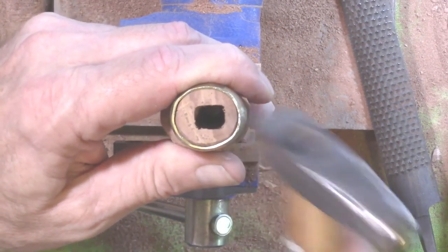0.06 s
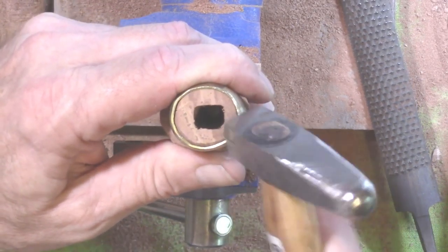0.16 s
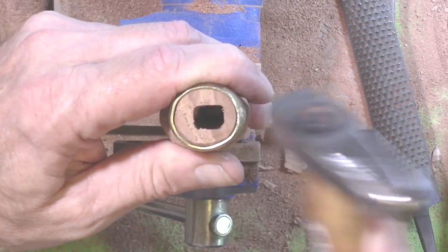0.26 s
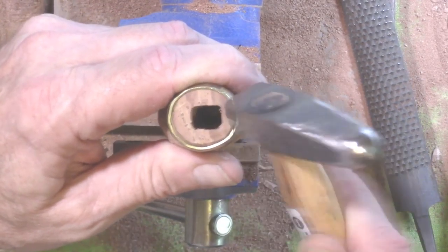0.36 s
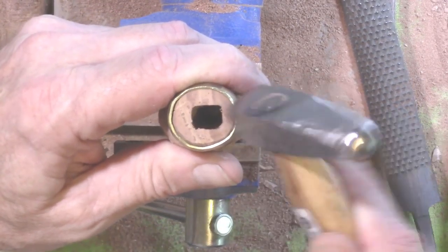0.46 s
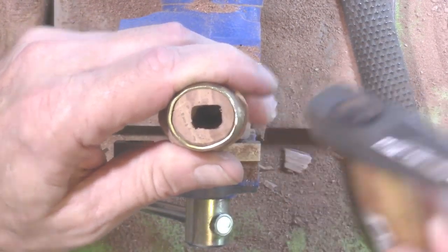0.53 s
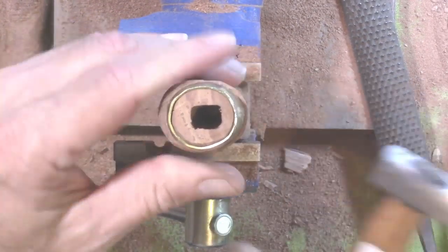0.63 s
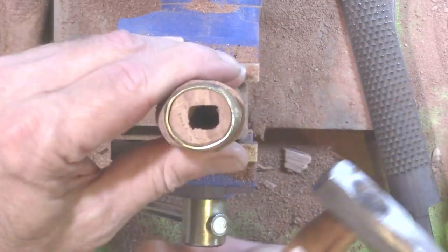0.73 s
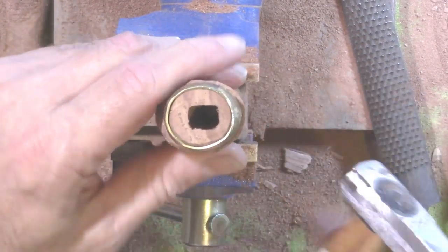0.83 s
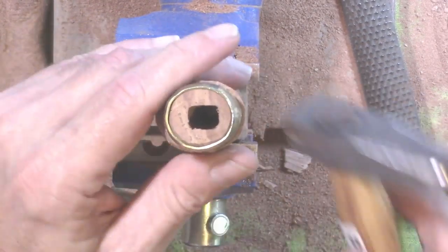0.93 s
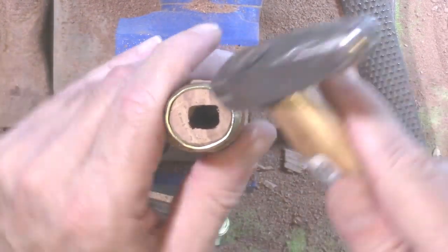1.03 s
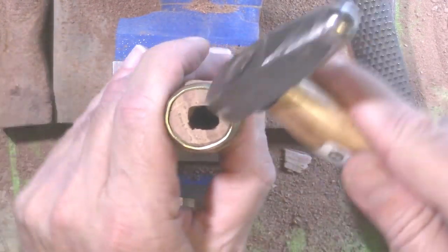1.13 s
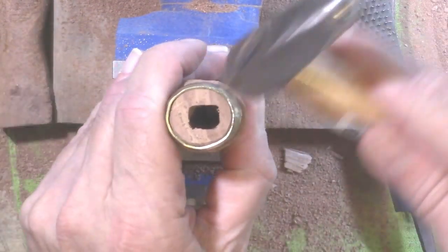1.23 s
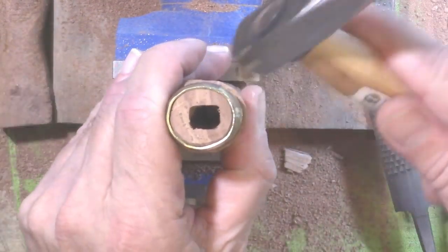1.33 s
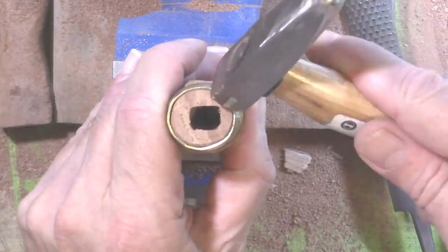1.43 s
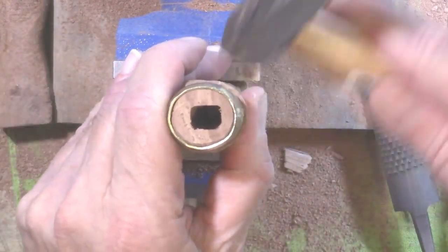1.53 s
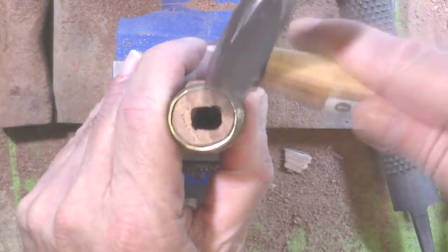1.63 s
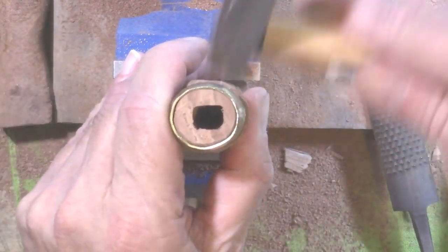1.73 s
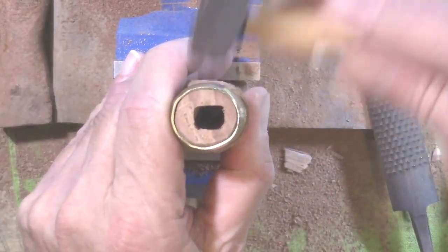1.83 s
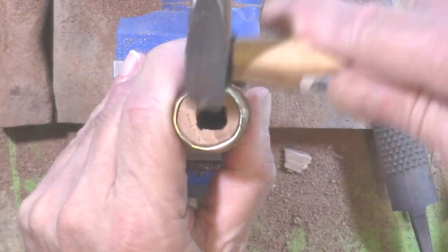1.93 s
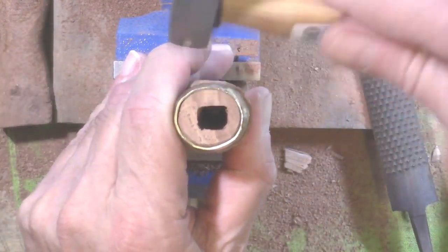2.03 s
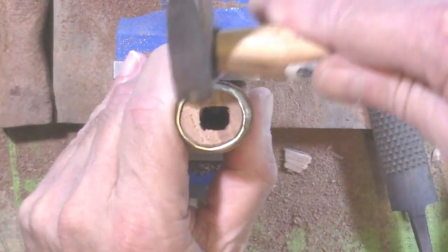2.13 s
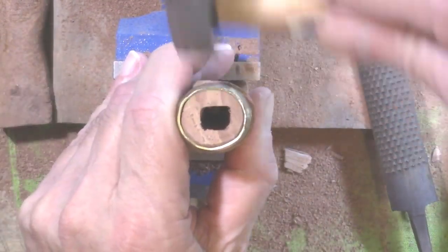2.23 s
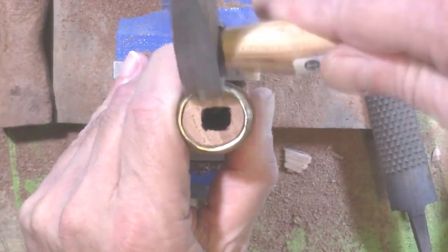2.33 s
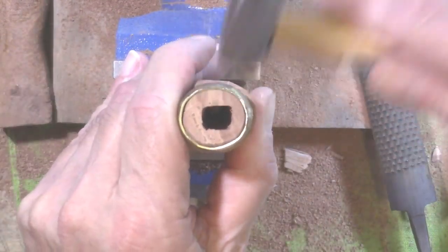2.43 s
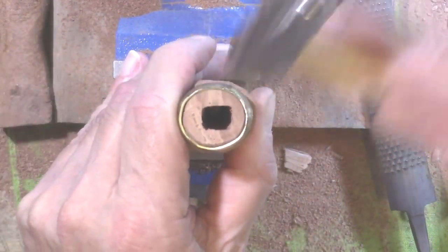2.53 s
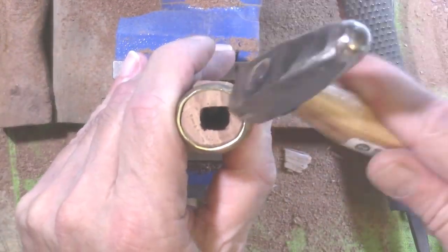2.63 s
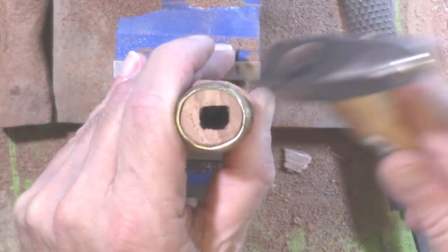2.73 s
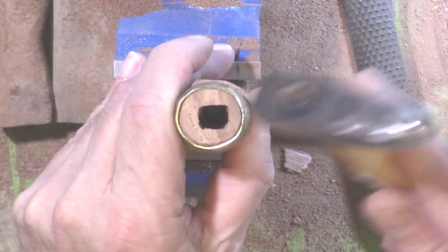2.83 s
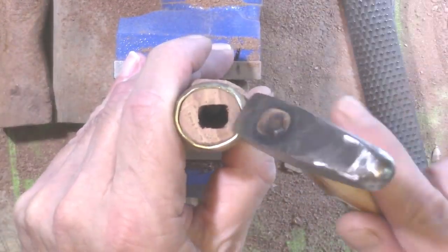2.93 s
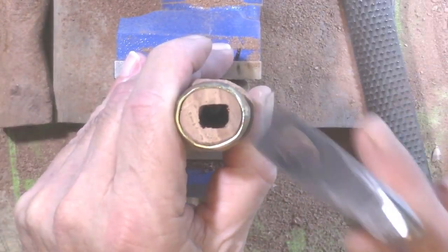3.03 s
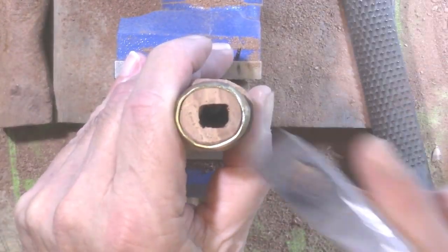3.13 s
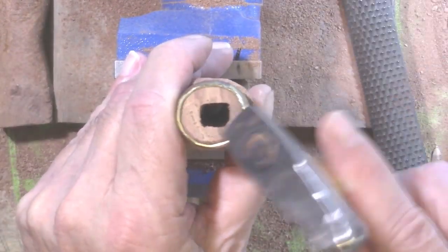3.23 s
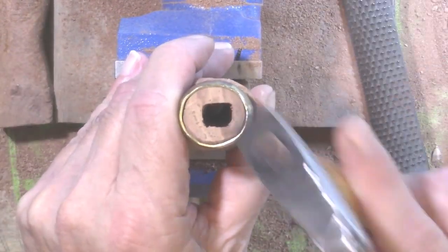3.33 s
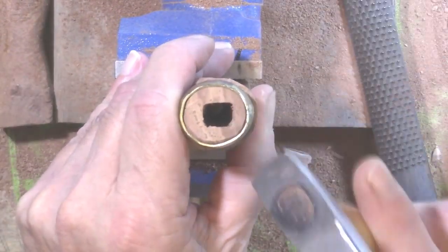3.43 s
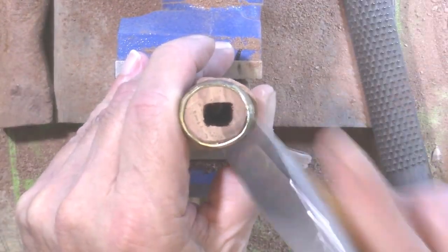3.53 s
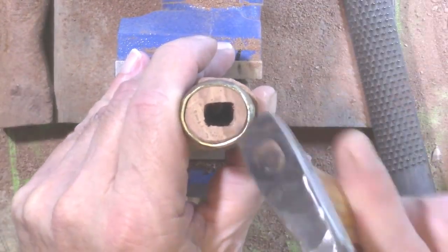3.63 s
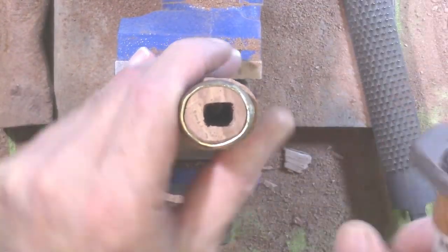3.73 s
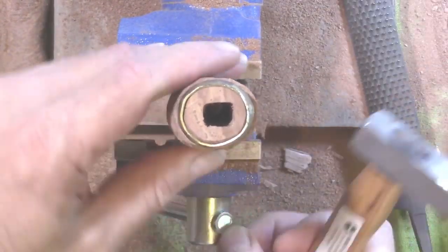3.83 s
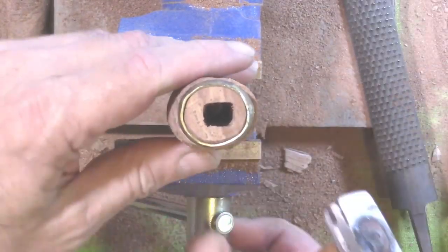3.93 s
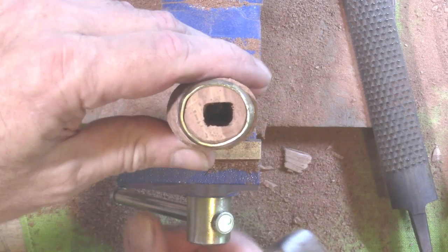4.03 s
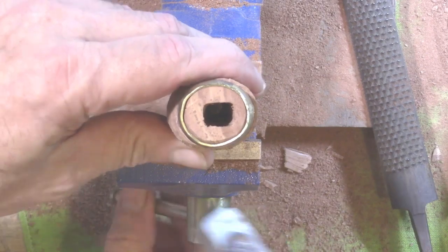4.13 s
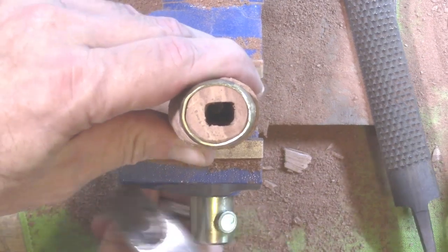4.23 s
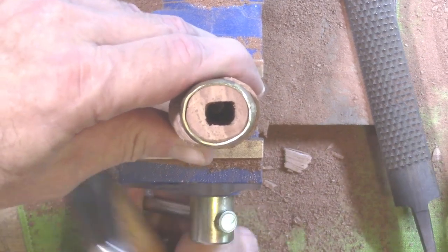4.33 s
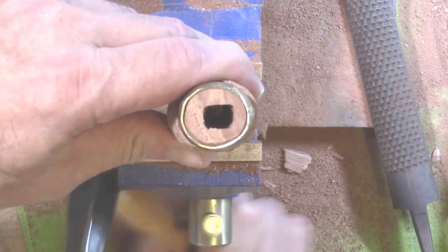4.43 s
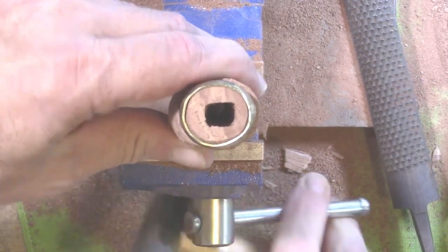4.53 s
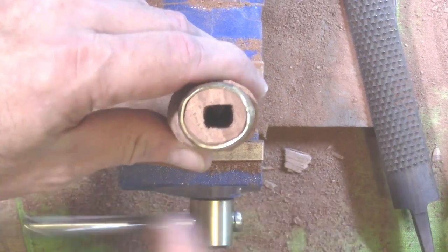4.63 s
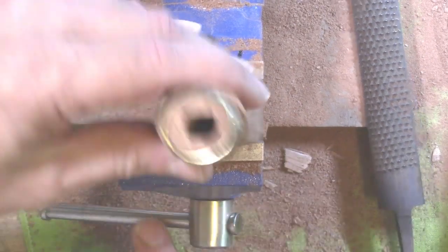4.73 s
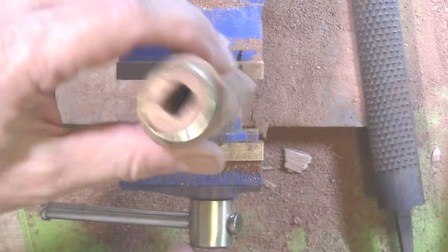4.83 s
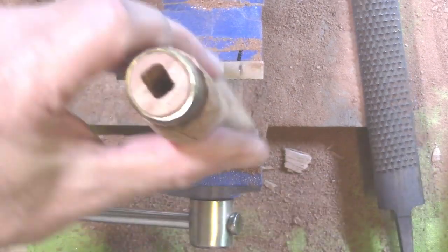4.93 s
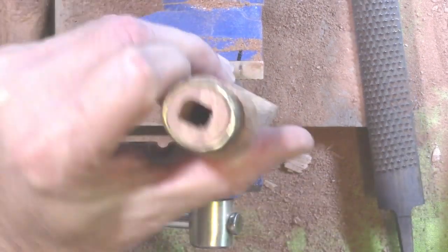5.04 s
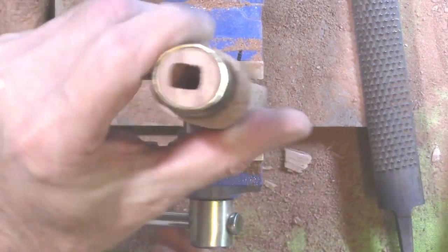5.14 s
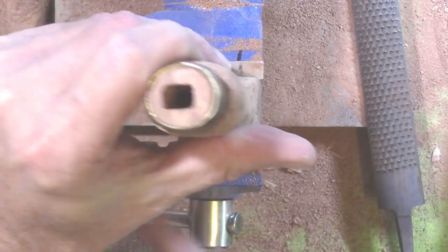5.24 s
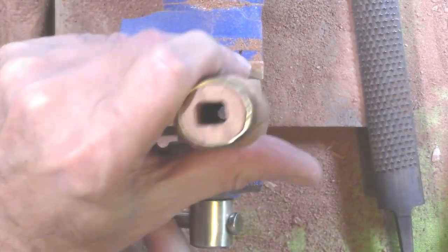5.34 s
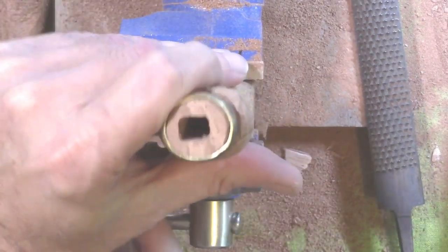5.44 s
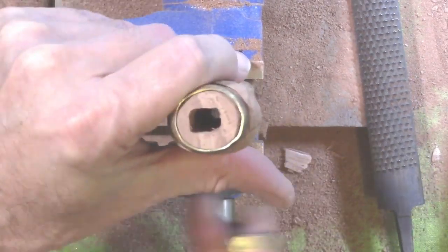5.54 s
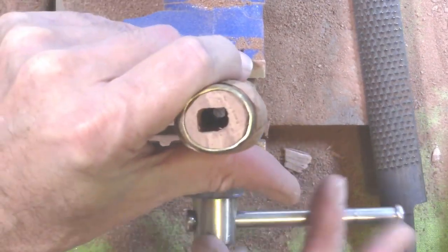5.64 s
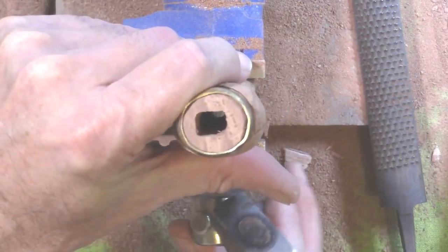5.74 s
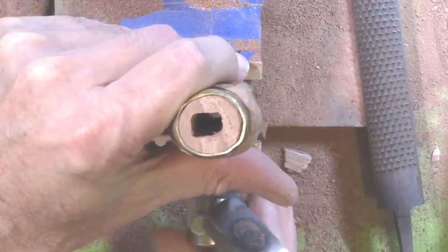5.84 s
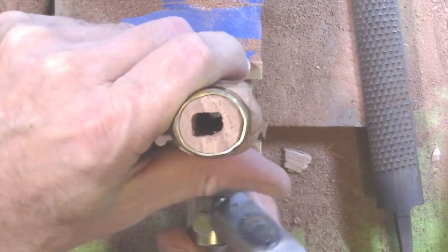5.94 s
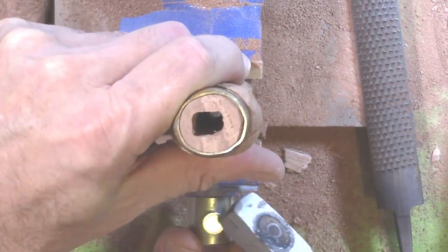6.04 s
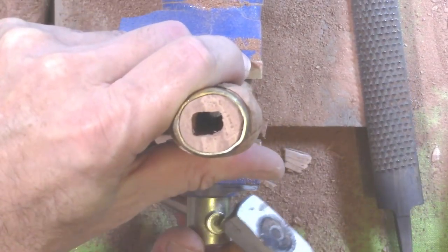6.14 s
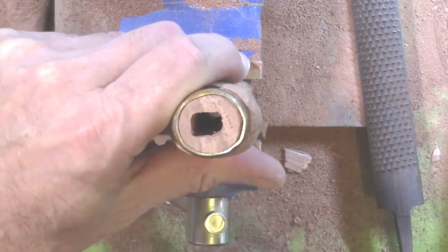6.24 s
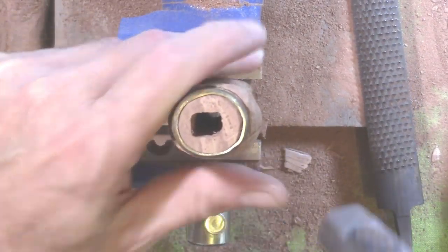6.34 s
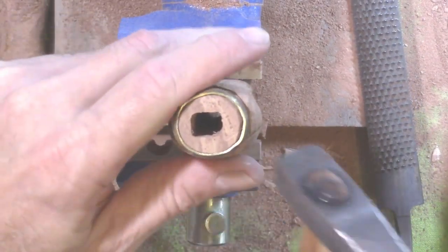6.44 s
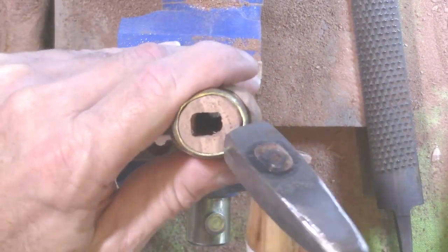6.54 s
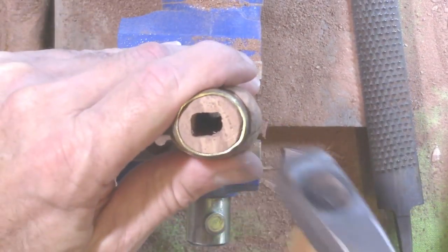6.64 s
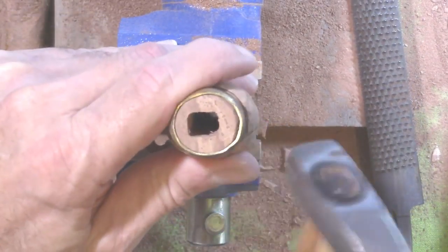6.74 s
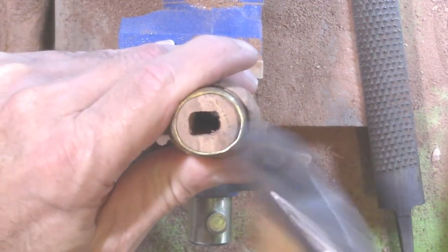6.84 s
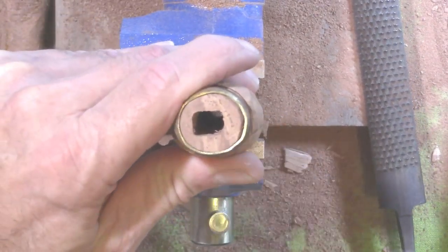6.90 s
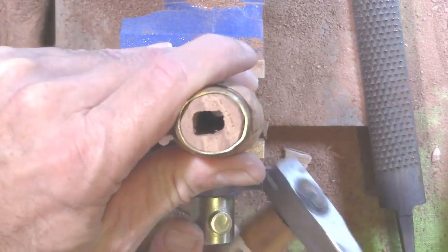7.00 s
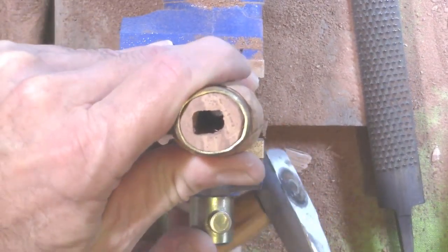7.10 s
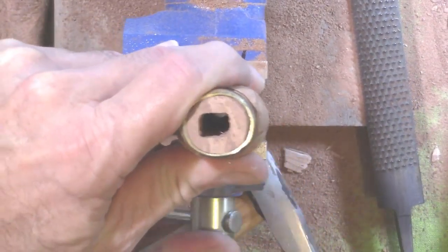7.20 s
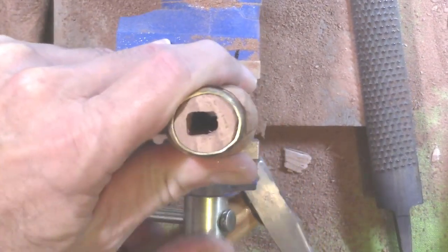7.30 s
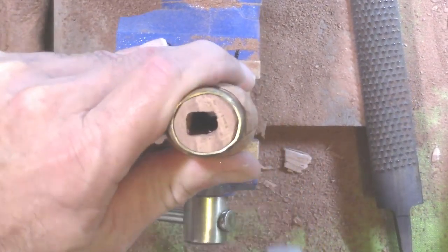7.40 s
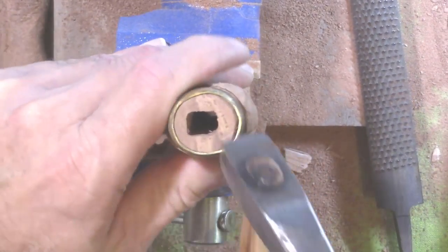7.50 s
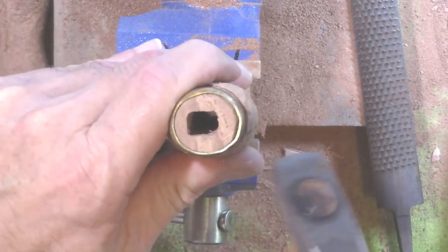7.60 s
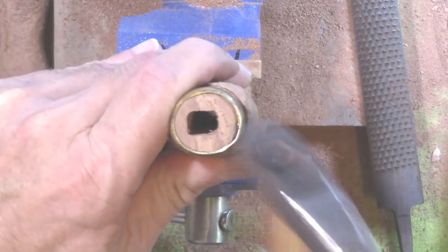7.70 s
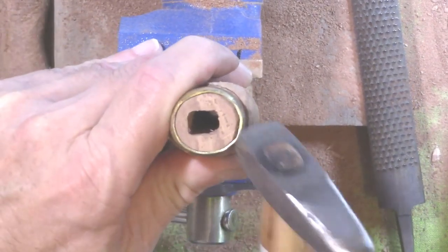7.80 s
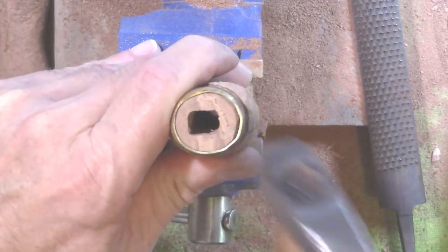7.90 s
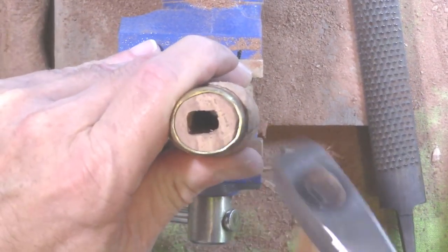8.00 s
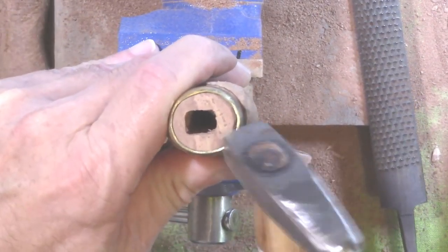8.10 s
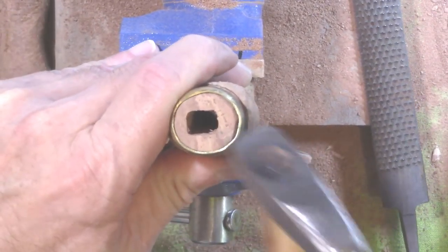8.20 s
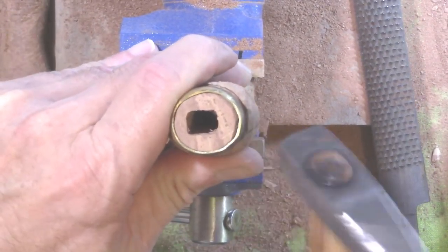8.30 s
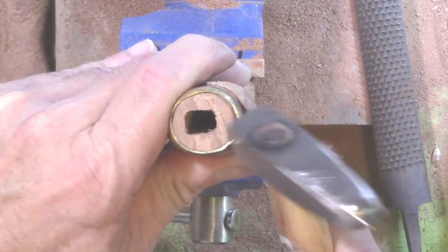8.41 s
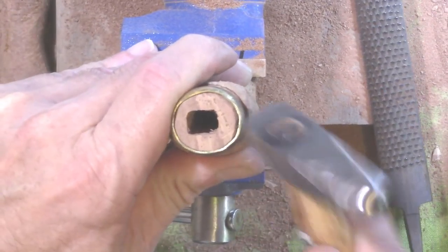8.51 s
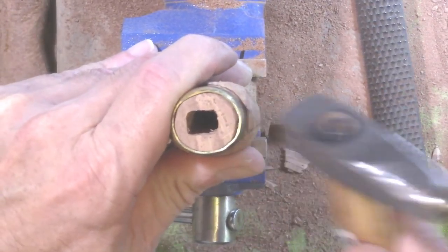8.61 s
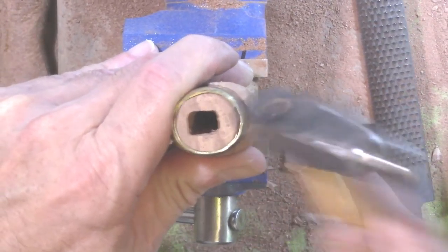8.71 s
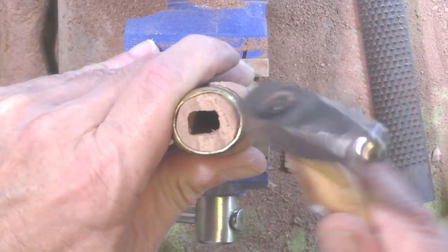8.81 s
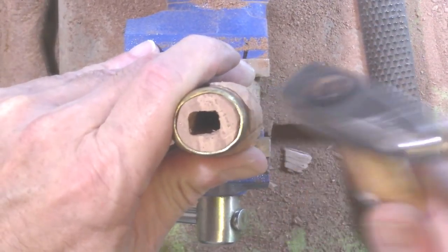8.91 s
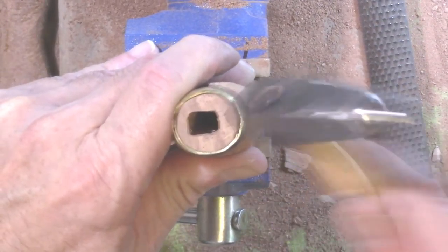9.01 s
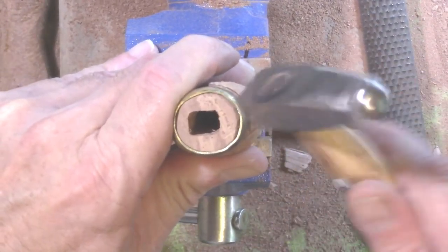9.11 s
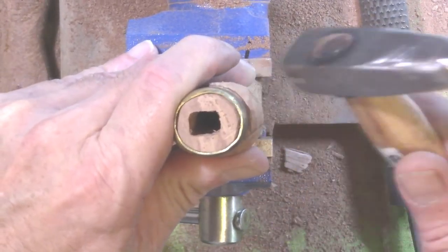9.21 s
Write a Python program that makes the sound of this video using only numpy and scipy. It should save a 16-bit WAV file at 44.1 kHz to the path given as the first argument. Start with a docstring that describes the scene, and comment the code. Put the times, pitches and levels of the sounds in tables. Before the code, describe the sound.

A small steel hammer taps a brass ring on a bench vise in rapid, even runs, broken by clinks and rattles as the piece is turned.

```python
"""A small steel hammer taps about 13 times a second round a brass ring held by hand on a bench vise.
Each blow is a noise crack and ringing modes of ring and head, over a thud of bench and vise modes.
Runs keep an even pace; the striking point creeps round the ring, so the colour shifts slowly.
Between runs the piece is turned and reseated: knocks and rattles (noise and modes), rubs, soft bumps.
Small workshop reverberation, steady hiss, close two-port microphone with a fast limiter."""
import sys
import numpy as np
from scipy import signal
from scipy.fft import rfft, irfft
from scipy.io import wavfile

SR = 44100
rng = np.random.default_rng(int(sys.argv[2]) if len(sys.argv) > 2 else 0)


def bounce(signal):
    """Save signal as a 16-bit WAV file at the path given by the first command-line argument."""
    frames = np.transpose(np.atleast_2d(signal))
    limited = np.clip(frames, -1, 1)
    pcm = np.round(limited * 32767).astype(np.int16)
    wavfile.write(sys.argv[1], SR, pcm)


N = 408366
SPAN = 16384   # samples in one contact sound
AGE = np.arange(SPAN) / SR   # s since the contact
HZ = np.maximum(np.fft.rfftfreq(SPAN, 1 / SR), 1)
ECHO_S = 0.011

# share of a low-frequency boost taken at each frequency: hz, share
BASS_SHARE = [(300, 0.21), (520, 0.73), (1050, 1), (1600, 0.06)]


def from_db(db):
    """Decibels to gain."""
    return 10 ** (np.asarray(db) / 20)


def at_hz(points, hz=HZ):
    """Interpolate a spectrum on a log-frequency axis."""
    point_hz, value = np.transpose(points)
    return np.interp(np.log(hz), np.log(point_hz), value)


def add(track, time_s, sound):
    """Mix a sound into a track from time_s."""
    start = int(np.clip(round(time_s * SR), 0, N - 1))
    track[start:start + len(sound)] += sound[:N - start]


def fade(t60_s):
    """Exponential decay of unit energy."""
    envelope = from_db(-60 * AGE / t60_s)
    return envelope / np.linalg.norm(envelope)


def coloured(sound, db):
    """Causal minimum-phase filter with the given dB on the HZ grid."""
    cepstrum = irfft(np.log(from_db(db)))
    # fold the cepstrum onto positive time
    cepstrum[1:SPAN // 2] *= 2
    cepstrum[SPAN // 2 + 1:] = 0
    response = np.exp(rfft(cepstrum))
    return irfft(rfft(sound) * response)


def ringing(modes):
    """Strike a set of decaying modes; the hand's grip varies their strength and pitch each time."""
    hz, peak_db, t60_s = np.transpose(modes)[:, :, None]
    hz = hz * (1 + 0.005 * rng.standard_normal(hz.shape))
    decay_per_s = np.log(1000) / t60_s
    varied_db = peak_db + 2 * rng.standard_normal(peak_db.shape)
    height = from_db(varied_db) * 2 * decay_per_s / SR   # resonance peak to starting amplitude
    height[1::2] *= -1   # every other mode starts in opposite phase
    age = AGE.astype(np.float32)
    waves = np.exp(-np.float32(decay_per_s) * age) * np.cos(np.float32(2 * np.pi * hz) * age)
    return height[:, 0] @ waves


def crack(grain, t60_s, snap_db, echo_s, echo_db):
    """Dense modes die fast after a sharp snap; bench top and wall throw a scatter back."""
    direct = fade(t60_s)
    snap = from_db(snap_db) * fade(0.0062)
    scatter = from_db(echo_db) * np.interp(AGE - echo_s, AGE, direct, left=0)
    return grain * np.sqrt(direct ** 2 + snap ** 2 + scatter ** 2)


def hiss():
    """Steady background of room air and microphone: shaped noise."""
    # hiss spectrum: hz, level_db
    spectrum = [(18, -27), (30, -21.5), (75, -11), (962, 2), (5170, -8), (7670, -13), (9460, -10.5),
                (14400, -18), (16000, -21.5)]
    level_db = -60   # RMS
    hz = np.maximum(np.fft.rfftfreq(N, 1 / SR), 1)
    noise = irfft(rfft(rng.standard_normal(N)) * from_db(at_hz(spectrum, hz)), N)
    return from_db(level_db) * noise / noise.std()


def blows():
    """Time the even strokes and aim each blow: (time_s, force, bench, ring, head, vise, treble in dB)."""
    # runs at the wrist's settled pace: first_s, count, period_s
    strokes = [(0.0289, 5, .0727), (0.3902, 2, .0773), (1.1464, 2, .0843), (1.3058, 7, .0711),
               (1.8003, 4, .0702), (2.0783, 7, .0702), (2.5684, 4, .0770), (2.8729, 4, .0744),
               (3.1765, 3, .0794), (3.4114, 4, .0770), (6.7009, 2, .0882), (6.8682, 1, .0800),
               (7.6543, 2, .0813), (7.8134, 7, .0778), (8.3541, 7, .0763), (8.8878, 5, .0734)]
    # drive as the hammer works round the ring:
    # time_s, force_db, bench_db, ring_db, head_db, vise_db, treble_db
    aim = [(0.03, 8, -4.5, -7.5, -3.5, 6.5, 1), (0.25, 8.5, -5.5, -5.5, 2.5, -8.5, 3.5),
           (0.47, 6.5, -4, -5.5, 3.5, -6, 2.5), (1.15, -3, -.5, 4, -5, -6, -.5),
           (1.23, 5, -0.5, -4.5, -1, 0, 1), (1.65, 6.5, 3, -6, -15, -6, 0.5), (1.95, 6, 4, 2, -7, -8, 3.5),
           (2.5, 7, 3, -4, -13, -4, 1), (2.65, 6.5, -0.5, 0.5, -10, -6, 3.5),
           (2.9, 4, -3.5, -3.5, 3.5, -11, 1.5), (3.15, 6, -2.5, -7, -10, 2, 1.5),
           (3.65, 8, 0.5, -6.5, -5, 8.5, 0), (6.7, 6, -5.5, -3, -0.5, 5.5, 0),
           (6.79, 2.5, -3.5, -27, -3, 0, 0), (6.87, 4, -4.5, -35, -1.5, 6.5, -0.5),
           (7.65, 7.5, -0.5, -12.5, -6, 1.5, -2.5), (8.15, 7, 0, -7, -8, 8.5, -4),
           (8.5, 7.5, -1.5, -7.5, -7, 2.5, -2), (8.75, 6, -2, 0.5, -9, 5, -1.5),
           (9.18, 8.5, -4.5, 0, -32, -3, -3)]
    # dull blows that glance off: time_s
    glancing_s = [1.31, 1.52, 2.01, 2.29, 2.36, 2.72, 6.79]
    glance_ring_db, glance_treble_db = -1.5, -4.5
    force_spread_db, ring_spread_db = 0.5, 0.7   # unsteady hand

    times_s = np.concatenate([first_s + period_s * np.arange(count) for first_s, count, period_s in strokes])
    aim_s, *controls = np.transpose(aim)
    force, bench, ring, head, vise, treble = [np.interp(times_s, aim_s, control) for control in controls]
    glances = np.abs(times_s[:, None] - glancing_s).min(axis=1) < 0.02
    unsteady = rng.standard_normal((len(times_s), 2))
    force = force + force_spread_db * unsteady[:, 1]
    ring = ring + ring_spread_db * unsteady[:, 0] + glance_ring_db * glances
    treble = treble + glance_treble_db * glances
    return zip(times_s, force, bench, ring, head, vise, treble)


def hammer(metal_db=-4.5, thud_db=-0.5, build_s=0.0028):
    """Metal crack plus bench thud per blow; neighbouring blows hit nearly the same spot and sound alike."""
    # modes of each part: hz, peak_db, t60_s
    bench_modes = [(533.3, 12, 0.076), (683.7, 16, 0.053), (1009, 14.5, 0.041), (1066.7, 12.5, 0.052),
                   (1237, 14, 0.24), (1467, 16.5, 0.075)]
    vise_modes = [(412.3, 8, .17), (704, 16.6, 0.34)]
    ring_modes = [(1718, 26.3, 0.02), (1815, 24, 0.094), (1852, 29.5, .04), (2109, 14.6, 0.059),
                  (2268, 19, 0.057), (2524, 17.6, .045), (2700, 18.4, 0.088), (3157, 19.7, .07),
                  (3690, 14, 0.073)]
    head_modes = [(4124, 22, 0.027), (4270, 24, 0.05), (4370, 12.5, 0.092), (4953, 12.3, 0.042)]
    # crowd of short-lived modes under them: hz, level_db
    body_spectrum = [(25, -12), (110, -15.5), (170, -11), (260, 1.5), (450, 6), (850, 10.5), (1400, 13),
                     (2400, 14.5), (4900, 12.5), (6400, 6.5), (8400, 10.5), (10800, 6), (13000, 0.5),
                     (16000, 0.5)]
    # share of the extra treble drive: hz, share
    treble_share = [(5500, 0), (9000, 1)]

    out = np.zeros(N)
    likeness = 0.8   # correlation of successive noise grains
    grain = rng.standard_normal((2, SPAN))
    slow_fade = fade(0.097)
    body, bass, top = at_hz(body_spectrum), at_hz(BASS_SHARE), at_hz(treble_share)
    slab = 1 / (1 + (HZ / 1400) ** 4)   # power share radiated by the heavy bench
    metal_share_db, slab_share_db = 10 * np.log10(1 - slab + 1e-4), 10 * np.log10(slab)
    build_up = 1 - np.exp(-AGE / build_s)   # heavy parts get moving
    swell = 1 - np.exp(-AGE / 0.0034)   # brass swells after the blow
    for time_s, force, bench, ring, head, vise, treble in blows():
        fresh = rng.standard_normal((2, SPAN))
        grain = likeness * grain + np.sqrt(1 - likeness ** 2) * fresh
        burst = crack(grain[0], t60_s=0.066, snap_db=-5.5, echo_s=ECHO_S, echo_db=-22)
        metal = coloured(burst, body + metal_db + treble * top + metal_share_db)
        metal += from_db(ring) * swell * ringing(ring_modes)
        metal += from_db(head) * ringing(head_modes)
        thud = coloured(grain[1] * slow_fade * build_up, body + thud_db + bench * bass + slab_share_db)
        thud += build_up * (from_db(bench) * ringing(bench_modes) + from_db(vise) * ringing(vise_modes))
        add(out, time_s, from_db(force) * (metal + thud))
    return out


def workshop(dry):
    """Diffuse tail of decaying noise bands, strong in the low middle, weak in the treble."""
    # octave bands of the reverberation: hz, level_db, t60_s
    room_bands = [(182, 0.5, 0.58), (380, -1, 0.46), (755, -3, 0.43), (1440, -11, 0.25),
                  (2850, -16.5, 0.21), (5760, -28, 0.37), (11520, -21, .13)]
    response = np.zeros(SPAN)
    for hz, level_db, t60_s in room_bands:
        band = signal.butter(2, [hz / np.sqrt(2), hz * np.sqrt(2)], "band", fs=SR, output="sos")
        tail = signal.sosfilt(band, rng.standard_normal(SPAN) * fade(t60_s))
        response += from_db(level_db) * tail
    build_up = 1 - np.exp(-AGE / 0.0024)
    return signal.fftconvolve(dry, response * build_up)[:N]


def fingers():
    """Sliding is a swell of gritty friction; the heel of the hand lands with a dull sine bump."""
    # fingers and piece sliding: middle_s, length_s, level_db
    rubs = [(0.626, 0.17, -50.5), (0.782, 0.064, -46), (0.943, .07, -36), (4.522, 0.11, -45.5),
            (4.587, 0.049, -46), (4.644, 0.064, -40), (4.713, 0.18, -48), (6.254, 0.26, -50.5),
            (6.409, 0.058, -38), (7.021, 0.022, -33.5), (7.357, 0.19, -55)]
    # hand bumping the vise: start_s, peak_db, pitch_hz
    bumps = [(1.004, -41, 280), (1.025, -40, 237), (6.282, -49, 216)]
    out = np.zeros(N)
    colour = at_hz([(60, -32), (500, 13.5), (2500, 10.5), (15000, -5.5)])
    for middle_s, length_s, level_db in rubs:
        slips = (rng.random(SPAN) < 4000 / SR) * rng.exponential(1, SPAN)   # about 4000 per s
        grit = rng.standard_normal(SPAN) * fade(0.015)
        friction = coloured(signal.fftconvolve(slips, grit)[:SPAN], colour)
        swell = np.sin(np.pi * np.minimum(AGE / length_s, 1)) ** 2
        add(out, middle_s - length_s / 2, from_db(level_db) * swell * friction / friction.std())
    envelope = fade(0.07)
    envelope = envelope / envelope[0]
    for start_s, peak_db, pitch_hz in bumps:
        add(out, start_s, from_db(peak_db) * envelope * np.sin(2 * np.pi * pitch_hz * AGE))
    return out


def handling(contacts, dense_db=-0.5):
    """Clinks on the jaws: each spot favours a cluster of modes; sharp contacts ring the piece."""
    # modes of the loosely held piece: hz, peak_db, t60_s
    clink_modes = [(1830, 25, 0.091), (2700, 24.5, 0.068), (2740, 22.5, 0.13), (4120, 23, 0.028),
                   (4520, 22, 0.055), (6420, 21.5, 0.027), (7800, 13, 0.033), (9400, 13.5, 0.054),
                   (10360, 18, 0.052)]
    # colour of a light knock on the jaws: hz, level_db
    jaws = [(40, -46), (200, -1.5), (600, 12), (2400, 14), (5000, 11.5), (9500, 10.5), (11500, 5),
            (15000, -1)]
    # ringing as the grip loosens and tightens: time_s, level_db
    looseness = [(1.0, 0), (4.11, -1), (4.22, 7.5), (4.35, 5), (4.55, -2.5), (6.5, 1.5), (7.0, 2), (7.4, 6)]
    # share of a knock's extra treble: hz, share
    knock_treble_share = [(3000, 0), (7000, 1), (14000, 1.5)]
    # light, low knocks have more thud; base value is at -20 dB force and 2 kHz
    base_bass_db, bass_db_per_force_db, bass_db_per_octave = 5, -0.28, -3.5

    out = np.zeros(N)
    top = at_hz(knock_treble_share)
    for time_s, force_db, treble_db, hz in contacts:
        burst = crack(rng.standard_normal(SPAN), t60_s=0.07, snap_db=-6.5, echo_s=ECHO_S, echo_db=-14)
        cluster_db = 11 * np.exp(-(np.log(HZ / hz) / 0.25) ** 2)
        bass_db = base_bass_db + bass_db_per_force_db * (force_db + 20)
        bass_db += bass_db_per_octave * np.log2(hz / 2000)
        colour = at_hz(jaws) + dense_db + bass_db * at_hz(BASS_SHARE) + treble_db * top + cluster_db
        dense = coloured(burst, colour)
        ring_db = min(treble_db, 0) + np.interp(time_s, *np.transpose(looseness))
        piece = from_db(ring_db) * ringing(clink_modes)
        add(out, time_s, from_db(force_db) * (dense + piece))
    return out


def ticks():
    """Faint, uneven contacts of the rattling piece, as rows for handling()."""
    # loose piece rattling while turned: start_s, end_s, force_db
    rattles = [(4.435, 4.77, -36), (5.215, 5.28, -39), (5.413, 5.62, -36), (5.966, 6.08, -36.5),
               (6.196, 6.42, -37), (7.05, 7.42, -33.5)]
    ticks_per_s, spread_db, treble_db = 26, 4, -4.5
    low_hz, high_hz = 1150, 5800
    rows = []
    for start_s, end_s, force_db in rattles:
        for slot_s in np.arange(start_s, end_s, 1 / ticks_per_s):
            hz = low_hz * (high_hz / low_hz) ** rng.random()
            time_s = slot_s + rng.random() / ticks_per_s
            rows.append((time_s, force_db + spread_db * rng.standard_normal(), treble_db, hz))
    return rows


def scene():
    """Two closely spaced ports hear nearly the same; a short scatter, mostly treble, differs."""
    # piece knocking on the jaws: time_s, force_db, treble_db, resonance_hz
    knocks = [(0.649, -23, -7, 1760), (0.778, -23, -13, 2040), (1.001, -13.5, -21, 1480),
              (1.0244, -15.5, -0.5, 1370), (4.107, -11.5, -7.5, 1840), (4.2269, -8.5, 1.5, 4370),
              (4.248, -11, -4, 2550), (4.3194, -20, -2, 2660), (4.53, -10, -2, 5800),
              (4.67, -8.5, 2.5, 2000), (4.9194, -21.5, -26, 1540), (4.9752, -29.5, -10, 1350),
              (5.131, -24.5, -11, 1620), (5.193, -28.5, -10, 1740), (5.3471, -23, 0.5, 1600),
              (5.572, -29.5, -5, 4070), (5.7415, -21, -1.5, 1840), (5.8448, -27, -7, 3840),
              (5.886, -12, -3.5, 6160), (5.9375, -19, 1, 1680), (6.1655, -22, -7, 5100),
              (6.2049, -24, -5, 1500), (6.2782, -24, -5.5, 764), (6.481, -26.5, -7.5, 1860),
              (6.5184, -11, -8.5, 1440), (7.0191, -20, 2.5, 3700), (7.0439, -19, -16, 1950),
              (7.139, -26.5, 1.5, 1600), (7.297, -26.5, -2, 4340), (7.3438, -19, -2.5, 2730),
              (7.357, -24, 3, 2800)]
    air = hiss()
    dry = hammer() + handling(knocks) + fingers() + handling(ticks())
    mid = dry + workshop(dry) + air
    late = AGE > 0.001
    scatter_colour = at_hz([(100, -21), (1000, -26), (3000, -15.5), (14000, -12.0)])
    scatter = coloured(rng.standard_normal(SPAN) * late * fade(0.0067), scatter_colour)
    side = signal.fftconvolve(mid, scatter)[:N]
    return np.array([mid + side, mid - side])


def limiter(x, threshold_db=-3.5, release_db_per_s=650, attack_s=0.00017):
    """Ducks peaks over the threshold with a linear dB release, flattening attacks into short plateaus."""
    level_db = 20 * np.log10(np.abs(x).max(axis=0) + 1e-9)
    over_db = np.maximum(level_db - threshold_db, 0)
    ramp_db = release_db_per_s * np.arange(N) / SR
    held_db = np.maximum.accumulate(over_db + ramp_db) - ramp_db
    pole = np.exp(-1 / (attack_s * SR))
    return x * from_db(-signal.lfilter([1 - pole], [1, -pole], held_db))


def record(dry):
    """Limiter, rounded peaks and a steep cut at the top."""
    ceiling, cutoff_hz = 0.85, 16000
    rounded = ceiling * np.tanh(limiter(dry) / ceiling)
    lowpass = signal.ellip(10, 0.3, 80, cutoff_hz, fs=SR, output="sos")
    return signal.sosfilt(lowpass, rounded)


dry = scene()
out = record(dry)
bounce(out)
```